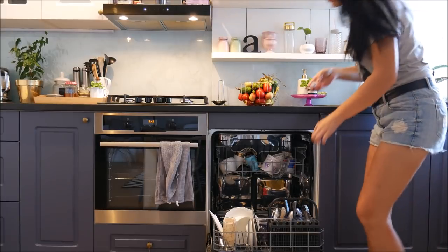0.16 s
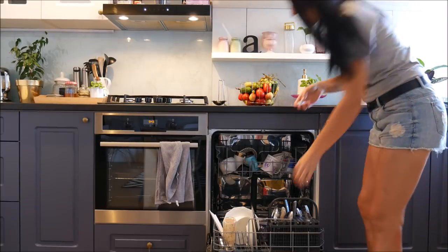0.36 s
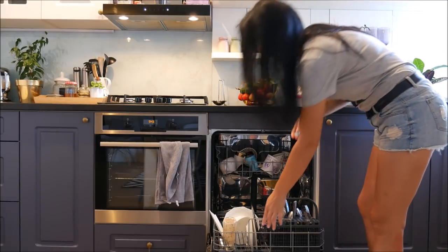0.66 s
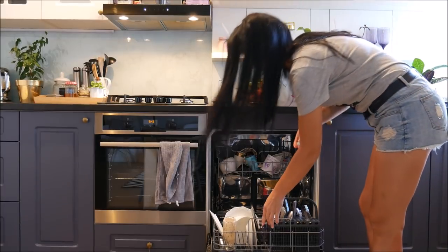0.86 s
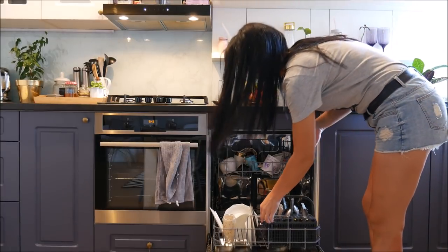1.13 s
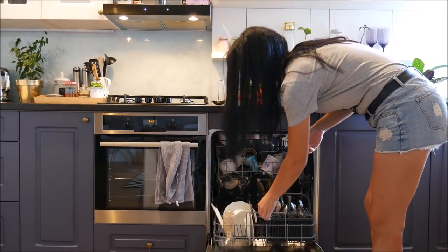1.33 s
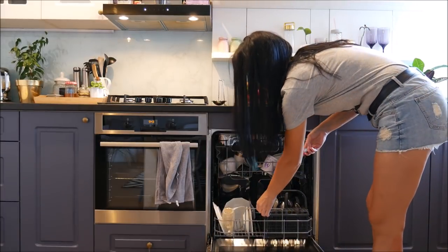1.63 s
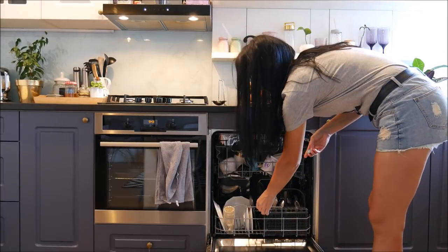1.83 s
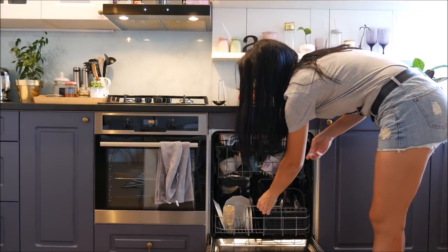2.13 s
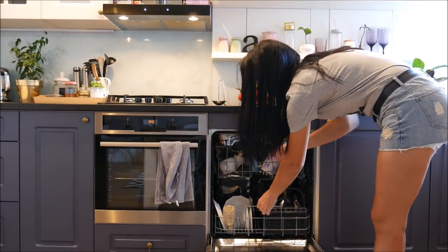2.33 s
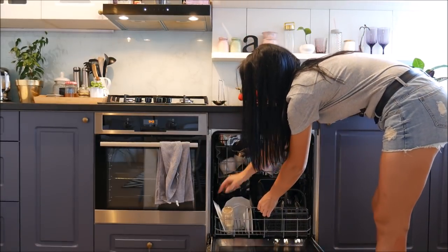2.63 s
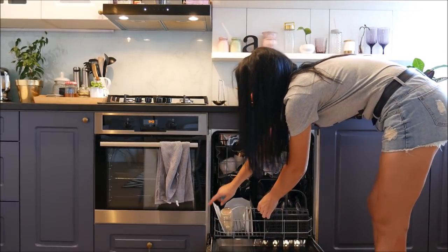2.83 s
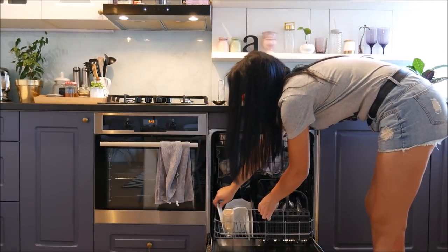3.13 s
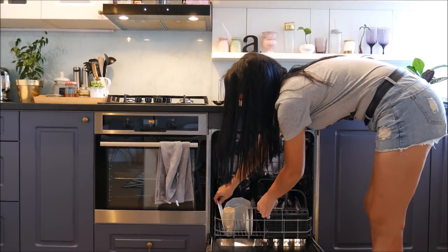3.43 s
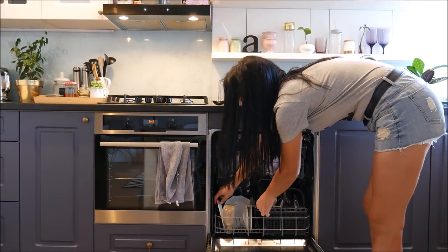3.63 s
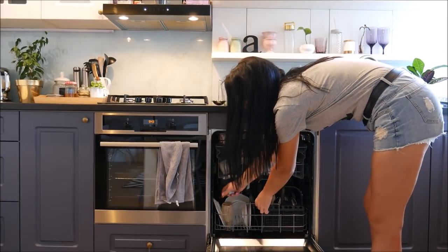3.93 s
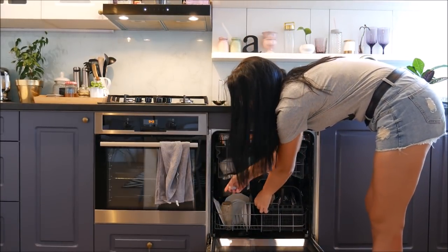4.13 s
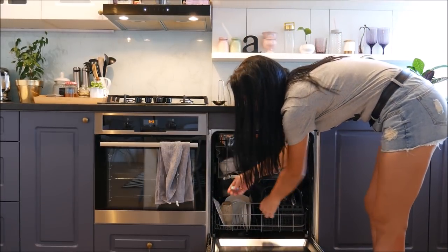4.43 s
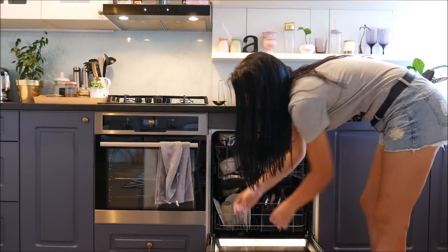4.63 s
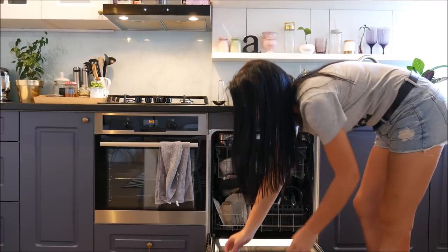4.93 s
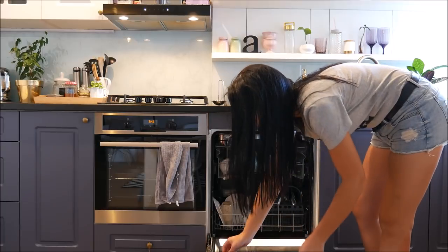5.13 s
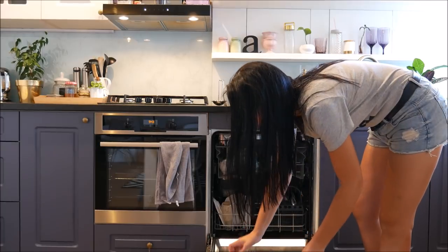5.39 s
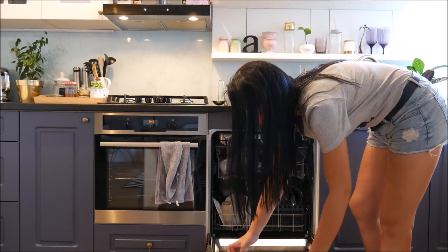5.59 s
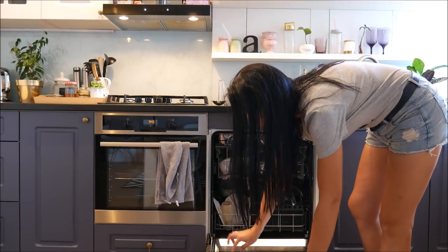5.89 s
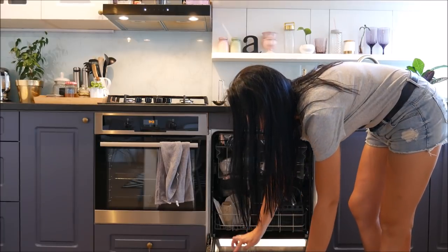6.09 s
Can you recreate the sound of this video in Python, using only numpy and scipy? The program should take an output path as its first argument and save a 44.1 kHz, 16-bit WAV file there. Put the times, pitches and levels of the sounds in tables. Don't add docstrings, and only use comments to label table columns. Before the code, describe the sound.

In a hard, echoing kitchen, a sole scuffs and a step knocks softly. A loaded dishwasher rack starts to rattle on its rails, then crashes: china clatters together with ringing cutlery. Scattered smaller plate clinks and wire jolts follow until the rack settles. After a faint scuff and dull door thud, there is quiet fingering and a crisp plastic lid snap. Stereo microphones nearby catch the room's short echo.

```python
import sys
import numpy as np
from scipy import signal
from scipy.fft import rfft, irfft
from scipy.io import wavfile
from scipy.ndimage import uniform_filter1d, minimum_filter1d

SR = 44100
rng = np.random.default_rng(int(sys.argv[2]) if len(sys.argv) > 2 else 0)


def makeup_ratio(level_db):
    decades = np.asarray(level_db, float) / 20
    return 10 ** decades


def inscribe(sig):
    pcm = np.round(np.clip(np.atleast_2d(sig).T, -1, 1) * 32767)
    wavfile.write(sys.argv[1], SR, pcm.astype(np.int16))


N = 275709

# start in seconds, strength in dB, chatter length in seconds,
# brightness in dB per octave.
PLATE_TOUCHES = [
    [(1.327, -17.5, 0.012, -10), (1.333, -29, 0.014, 0.5), (1.385, -22.5, 0.23, 2.5), (1.467, 0, 0.19, -1),
     (1.495, -9, 0.061, 2), (1.53, -9, 0.02, 4), (1.555, -7.5, 0.033, 6), (1.58, -13, 0.026, 1.5),
     (1.605, -4, 0.0094, -2), (1.63, -7, 0.015, 2), (1.665, -10, 0.015, -1.5), (1.70, -19.5, 0.017, -4.5),
     (1.745, -30, 0.0067, -2)],
    [(2.0103, -22, 0.015, 0.5), (2.0926, -31.5, 0.0047, -5), (2.4044, -73.5, 0.046, 22),
     (2.5212, -25, 0.02, 2.5), (2.5551, -20, 0.014, 2.5)],
    [(2.6938, -24.5, 0.0035, 9), (2.7, -16.5, 0.029, -4), (2.718, -27, .015, -12), (2.735, -28, 0.01, -3.5),
     (2.886, -40, 0.0045, 0)],
    [(3.044, -31, 0.0047, 6.5), (3.05, -18, 0.0053, -0.5), (3.062, -19, 0.024, -3), (3.0944, -27, 0.01, -3),
     (3.127, -25.5, 0.0096, -9), (3.139, -32, 0.0068, -4), (3.168, -43, .008, 2), (3.261, -46, .01, 6)],
    [(3.5344, -44, 0.0043, -8), (3.5907, -38, 0.033, 3), (3.6217, -20.5, 0.0053, -3),
     (3.6611, -26.5, 0.045, -11)],
    [(3.7284, -17, 0.0094, -1.5), (3.7354, -30, 0.0039, 3), (3.7429, -19.5, 0.016, 3),
     (3.7883, -23.5, 0.017, 5.5), (3.8457, -9, 0.018, -0.5), (3.875, -31, 0.01, -11),
     (3.9429, -26, 0.0068, 2), (3.9948, -34.5, 0.0092, 2)],
    [(4.0751, -37, 0.0093, 5.5), (4.1011, -30.5, 0.027, 5), (4.1629, -25.5, 0.019, 2.5),
     (4.2, -33, 0.0091, -4), (4.3914, -55, 0.0042, 5), (4.4209, -48, 0.004, 6)],
]
CHATTER_DB = [-4.5, -5, 7, 2.5, -5, 1, 0.5]
RING_T60_S = [.055, 0.046, 0.056, 0.027, 0.049, 0.064, 0.062]
# frequency in Hz, level in dB.
DINNER_PLATES = [(1927, -53), (2300, -36), (2509, -25.5), (3724, -29), (3862, -34), (3962, -25),
                 (5157, -31.5), (5243, -32.5), (5922, -34), (6239, -45), (6804, -34.5), (7197, -36),
                 (8236, -41.5), (8613, -49.5)]
BOWLS = [(2245, -58.5), (2460, -50.5), (2579, -54.5), (2686, -51), (2859, -62.5), (3671, -57.5),
         (4037, -44.5), (5254, -63.5), (5405, -56.5), (5529, -67.5), (5900, -65), (7262, -64)]
SINGLE_PLATE = [(2326, -57.5), (2498, -38.5), (3386, -59), (3718, -37.5), (4008, -47), (4435, -48.5),
                (5023, -63), (5255, -51), (5356, -50), (6191, -53), (6406, -65), (6568, -56), (6826, -53.5)]
SIDE_PLATES = [(2051, -64), (2293, -56), (2492, -43), (2762, -49.5), (3499, -66), (3784, -49), (3935, -49),
               (4032, -53), (4500, -57), (5265, -40.5), (5486, -65.5), (6315, -70), (6595, -53),
               (7187, -52)]
SAUCERS = [(2380, -54), (2681, -51.5), (3295, -64.5), (3467, -59), (3650, -66), (4032, -54), (4474, -66),
           (5335, -69), (5599, -57), (5776, -66), (6239, -64), (6632, -65), (6869, -66)]
PLATE_ROW = [(2304, -61), (2470, -32), (2507, -34), (2573, -38), (2939, -57.5), (3693, -44), (3790, -39.5),
             (3908, -51.5), (4000, -37.5), (5367, -42), (6293, -46.5), (6551, -59), (6869, -48),
             (7235, -50)]
LAST_PLATES = [(2040, -60.5), (2430, -34.5), (2560, -35), (3130, -49), (3800, -38), (4020, -42.5),
               (4780, -67.5), (4990, -60.5), (5330, -39), (5820, -57.5), (6250, -49), (6840, -56.5),
               (7260, -55)]
# frequency in Hz, level in dB.
CUTLERY = [(8328, -8), (8935, 2), (9640, 0.5), (9981, -7.5), (11020, -8.5), (11250, -1.5), (11510, -24),
           (12096, -13.5), (12280, -12.5), (12700, -20), (13367, -20.5), (13760, -15.5), (14800, -20),
           (15374, -16.5)]
CUTLERY_DB = [-45, -75, -65, -63.5, -71.5, -56, -58.5]
CUTLERY_T60_S = 0.14

# time in seconds, rattle in dB.
RAIL_PUSHES = [
    [(.968, -39), (1.02, -44), (1.14, -48.5), (1.2, -52), (1.33, -47)],
    [(2.4, -76), (2.52, -49.5), (2.66, -41.5), (2.7, -40)],
    [(3.25, -54), (3.32, -57.5), (3.52, -46.5), (3.75, -47)],
    [(4.0, -53), (4.06, -31), (4.21, -43.5), (4.45, -66), (4.52, -83.5), (4.77, -67), (5.05, -83.5)],
]
RUMBLE_DB, RUMBLE_FOLLOWS = -53, 1
# start in seconds, panel-moving weight in dB, cracking edge in dB,
# length in seconds, loose parts in dB.
STEP_JOLTS = [
    (0.059, -101, -44, 0.028, 3),
    (0.285, -48.5, -40.5, 0.053, 2),
    (0.336, -36, -58, 0.0082, -6),
    (0.379, -54, -69, .013, -3),
    (0.442, -72, -74, 0.025, 22.5),
    (0.758, -83.5, -49, 0.037, 11.5),
]
RACK_JOLTS = [(0.973, -51, -51, 0.031, 6.5), (1.161, -47, -53.5, 0.03, 8), (1.323, -18.5, -25.5, 0.039, -4),
              (1.385, -41, -19.5, 0.085, 6.5), (1.468, -27, -1.5, 0.04, -2), (1.498, -28, 5, 0.027, 0.5),
              (1.531, -22.5, 3, 0.031, -1.5), (1.562, -30, 3, 0.038, 6.5), (1.591, -31.5, -6, 0.022, 5.5),
              (1.625, -28, -0.5, 0.028, 1.5), (1.66, -32, -12, 0.026, 2), (1.719, -41.5, -19, 0.013, 0),
              (1.85, -41, -49, 0.047, 6), (2.003, -38, -31, 0.059, 1), (2.46, -45, -104, 0.034, -2),
              (2.521, -60, -24, 0.018, -2), (2.554, -46.5, -19.5, 0.025, 5.5),
              (2.697, -41, -20, 0.076, 1.5), (2.884, -39.5, -65, 0.031, -2.5),
              (2.978, -38.5, -53, 0.024, 2), (3.005, -34.5, -69, 0.021, -8),
              (3.043, -34.5, -21.5, 0.042, -1.5), (3.129, -35.5, -20, 0.028, -0.5),
              (3.257, -51, -24.5, 0.017, 2), (3.539, -61, -45, 0.0082, 0), (3.617, -46, -31, 0.038, 2.5),
              (3.731, -68, -28, 0.18, 12), (3.785, -26.5, -20.5, 0.033, -4), (3.845, -39, -18.5, 0.042, 4),
              (4.045, -51, -30, 0.0083, 6), (4.098, -45, -19.5, 0.024, -7), (4.162, -36, -22.5, 0.023, -3),
              (4.388, -56.5, -38, 0.026, 5.5), (4.42, -90, -30.5, 0.021, -1)]
DOOR_JOLTS = [
    (4.701, -54, -85.5, 0.015, -6.5),
    (4.959, -55, -47, 0.069, -16.5),
    (5.058, -48.5, -53, 0.027, 16),
    (5.078, -50, -60.5, 0.014, 19.5),
    (5.098, -39.5, -46.5, 0.11, -10),
    (5.15, -35.5, -42.5, 0.03, -2.5),
    (5.179, -39, -18.5, 0.015, 5),
    (5.2, -33, -35.5, 0.0075, 3),
    (5.218, -34.5, -30.5, 0.011, 3.5),
]
FINGER_JOLTS = [
    (5.588, -70, -55.5, 0.02, 4),
    (5.766, -78.5, -54, .012, -3.5),
    (5.843, -60.5, -35, 0.0082, 3),
    (5.896, -43.5, -30.5, 0.014, 3),
    (5.912, -42, -30, 0.023, 1),
]
LID_JOLTS = [
    (6.147, -24.5, -2, 0.0065, 1),
    (6.155, -24, 1.5, 0.0073, -2),
    (6.169, -20, -19.5, .008, 7.5),
    (6.186, -31, -19.5, 0.006, 7),
    (6.203, -34, -17, 0.0065, 6),
]
# share of weight 0-1 driving the wires, offset in dB.
WIRE_MIX = [(.35, -6), (.6, 0.5), (.6, -4.5), (.6, 1.5), (.6, -6.04)]
# frequency in Hz, width in Hz, level in dB.
PANELS = [
    [(152, 30, -34), (217, 10.4, 11), (283, 43, 7)],
    [(162.8, 11, -5.5), (211, 26, 1), (297.8, 11, 1.5), (348.6, 16, 2.5), (421, 12, -2.5)],
    [(152, 13, -7.5), (185.3, 32, 7.5), (228.3, 15.6, 2), (414, 16, -23.5)],
    [(150.3, 22, -30.5), (197, 13, 11.5), (340, 26, -8.5)],
    [(221.8, 18.8, 1.5), (379, 24.6, 3)],
]
# frequency in Hz, width in Hz, level in dB.
WIRES = [
    [(520, 41, 18), (590, 51, 11.5), (667, 42, 18.5), (851.4, 41, 2.5), (957, 36, 12.5), (1555, 48, 12),
     (2610, 45, -2)],
    [(538, 30, -11.5), (752.5, 78, 7.5), (920, 350, -1.5), (1032.5, 70, 8.5), (1324, 29, -3)],
    [(532, 42, -8), (610, 32.5, 8.5), (760, 210, 0), (873, 34, 4.5), (991, 23, 6.5)],
    [(616, 23.7, -3), (737, 61, 2.5), (899, 93, -2.5), (1020, 21.2, 4.5), (1258, 17, 11)],
    [(650, 40, 2.5), (765, 50, 13), (930, 50, 10), (1010, 40, 6.5), (1250, 52.4, -0.5)],
]
WIRES_TOP_HZ = [1960, 2378, 1080, 2230, 2160]
HARDNESS = [1.075, 1.23, 1.24, 1.12, 1.02]
# frequency in Hz, density in dB per Hz.
WIRE_CRACK = [(900, -31), (1600, -13.5), (3000, -17), (5000, -13), (7500, -12), (10000, -9), (13000, -18),
              (15500, -26.5)]
# frequency in Hz, density in dB per Hz.
CATCH_SNAP = [(880, -44.5), (1500, -27.5), (2070, -17), (2420, -6.5), (3570, -5), (6000, -0.5), (8500, 9),
              (11000, 1), (15400, -18)]

# start in seconds, level in dB, length in seconds.
WHEEL_DROPS = [
    (1.36, -42, 0.034),
    (1.482, -34, 0.051),
    (2.015, -57, .04),
    (3.63, -56.5, 0.03),
    (3.77, -37.5, 0.044),
    (4.042, -46.5, 0.06),
    (4.157, -47.5, 0.043),
]
# frequency in Hz, width in Hz, level in dB.
TUB_MODES = [(73, 17, 1), (100, 25, 8.5), (161, 14, -4)]
# start in seconds, length in seconds, first Hz, last Hz, level in dB.
SOLE_SCUFFS = [
    (0.049, 0.27, 1280, 1830, -68),
    (4.62, 0.41, 1940, 2210, -71.5),
]
SCUFF_WIDTH_HZ = 180

# frequency in Hz, t60 in seconds.
KITCHEN_T60 = [(100, 0.6), (250, 0.41), (700, 0.66), (2000, 0.44), (5000, 0.44), (10000, 0.31),
               (15000, 0.16)]
# frequency in Hz, left-right likeness -1 to 1.
ECHO_LIKENESS = [(60, -.8), (200, -0.1), (600, 0.3), (1200, 0.1), (2200, .82), (4000, 0.77), (7000, 0.8),
                 (12000, -0.2)]
# frequency in Hz, level in dB.
HUSH = [(18, -39), (30, -17.5), (203, 2.5), (471, -5.5), (981, -7), (1090, -10), (5830, -20.5),
        (7990, -22.5), (9860, -21), (14600, -30), (15800, -48.5)]
HUSH_DB = -68
# frequency in Hz, level in dB.
TREBLE_FLOOR = [(6500, -70), (7800, -52), (11000, -46), (13000, -42), (15500, -40)]


def at_hz(points, hz):
    table = np.array(points)
    return np.interp(np.log(np.maximum(hz, 1)), np.log(table[:, 0]), table[:, 1])


def rms_one(x):
    return x / np.sqrt(np.mean(x ** 2) + 1e-20)


def coloured(x, spectrum):
    return irfft(rfft(x) * makeup_ratio(at_hz(spectrum, np.fft.rfftfreq(N, 1 / SR))), N)


def butter(x, order, hz, kind):
    return signal.sosfilt(signal.butter(order, hz, kind, fs=SR, output="sos"), x)


def burst(start_s, length_s, rise_s=0.00067):
    start = round(start_s * SR)
    t = np.arange(min(N - start, SR // 2)) / SR
    return start, np.exp(-(t / np.clip(length_s, .002, .2)) ** 2) * np.minimum(t / rise_s, 1)


def ring(clicks, hz, t60_s):
    r = makeup_ratio(-60 / (t60_s * SR))
    w = 2 * np.pi * hz / SR
    return signal.lfilter([0, np.sin(w)], [1, -2 * r * np.cos(w), r * r], clicks + 1e-18)


def resonances(x, peaks, low_hz, high_hz, between_db):
    out = makeup_ratio(between_db) * x
    for k, (hz, width_hz, level_db) in enumerate(peaks):
        r = np.exp(-np.pi * max(width_hz, 5) / SR)
        zeros = [(1 - r * r) / 2, 0, (r * r - 1) / 2]
        poles = [1, -2 * r * np.cos(2 * np.pi * hz / SR), r * r]
        out = out + (-1) ** k * makeup_ratio(level_db) * signal.lfilter(zeros, poles, x + 1e-18)
    return butter(out, 3, [low_hz, high_hz], "band")


def grit(per_s, spread_db):
    sizes = makeup_ratio(spread_db * np.minimum(rng.exponential(1, N), 4)) * rng.choice([-1, 1], N)
    return rms_one(sizes * (rng.random(N) < per_s / SR))


def plates(touches, tones, chatter_db, t60_low_s, damping=0.3, first_spread_db=8.0):
    first, chatter, bright = np.zeros((3, N))
    for start_s, peak_db, length_s, tilt_db in touches:
        start, shape = burst(start_s, length_s)
        first[start] = makeup_ratio(peak_db)
        chatter[start:start + len(shape)] += makeup_ratio(peak_db + chatter_db) * shape
        bright[start:] = tilt_db
    heard = slice(round(touches[0][0] * SR) - 1, round(touches[-1][0] * SR) + SR)
    first, chatter, bright = first[heard], chatter[heard], bright[heard]
    rebounds = np.flatnonzero(rng.random(N)[heard] < 500 / SR)
    at = np.flatnonzero(first)
    top_db = max(db for hz, db in tones)
    out = np.zeros(N)
    for hz, level_db in tones:
        clicks = np.zeros(len(first))
        octaves = np.log2(hz / 2500)
        luck = rng.standard_normal(2000)
        rebound_gain = makeup_ratio(bright[rebounds] * octaves)
        clicks[rebounds] = chatter[rebounds] * luck[:len(rebounds)] * rebound_gain
        first_gain = makeup_ratio(first_spread_db * luck[-len(at):] + bright[at] * octaves)
        clicks[at] = first[at] * np.sign(luck[-40:][:len(at)]) * first_gain
        is_china = hz < CUTLERY[0][0]
        t60_s = t60_low_s * (hz / 2500) ** -damping if is_china else CUTLERY_T60_S
        twin_hz = hz * (1 + 0.007 * luck[1001])
        twin = makeup_ratio(-8.0) * ring(clicks * np.sign(luck[1000]), twin_hz, t60_s)
        out[heard] += makeup_ratio(level_db - top_db - 12.0) * (ring(clicks, hz, t60_s) + twin)
    return out


def all_crockery():
    stacks = [DINNER_PLATES, BOWLS, SINGLE_PLATE, SIDE_PLATES, SAUCERS, PLATE_ROW, LAST_PLATES]
    groups = zip(PLATE_TOUCHES, stacks, CUTLERY_DB, CHATTER_DB, RING_T60_S)
    out = np.zeros(N)
    for touches, china, basket_db, chatter_db, t60_s in groups:
        basket = [(hz, db + basket_db) for hz, db in CUTLERY]
        out += plates(touches, china + basket, chatter_db, t60_s)
    return out


def shaken(jolts, mix, pushes, panel_modes, wire_modes, top_hz, hardness, edge, coarse, medium):
    boom, body, crack, sparkle = np.zeros((4, N))
    weight_share, offset_db = mix
    for start_s, weight_db, edge_db, length_s, loose_db in jolts:
        start, shape = burst(start_s, length_s)
        span = slice(start, start + len(shape))
        body_db = weight_share * weight_db + (1 - weight_share) * edge_db + offset_db + loose_db
        boom[span] += makeup_ratio(weight_db) * shape
        body[span] += makeup_ratio(body_db) * shape
        crack[span] += makeup_ratio(edge_db) * shape
        soft_start = np.minimum(np.arange(len(shape)) / (.004 * SR), 1)
        sparkle[span] += makeup_ratio(hardness * edge_db - 2.0) * shape ** 1.1 * soft_start
    t = np.arange(N) / SR
    for rows in pushes:
        s, level_db = np.transpose(rows)
        moving = np.clip(np.minimum(t - s[0], s[-1] - t) / 0.0099, 0, 1)
        rattle_db = np.interp(t, s, level_db)
        boom += moving * makeup_ratio(RUMBLE_DB + RUMBLE_FOLLOWS * (rattle_db + 53.0))
        body += moving * makeup_ratio(rattle_db + 1.0)
        crack += moving * makeup_ratio(rattle_db - 1.5)
    panels = resonances(boom * coarse, panel_modes, 120, 480, between_db=-13.0)
    wires = resonances(body * medium, wire_modes, 390, top_hz, between_db=-5.0)
    dull, bright = edge
    return makeup_ratio(21.5) * panels + makeup_ratio(11.5) * wires + makeup_ratio(-6.5) * (crack * dull + sparkle * bright)


def tub(coarse):
    push = np.zeros(N)
    for start_s, level_db, length_s in WHEEL_DROPS:
        start, shape = burst(start_s, length_s, rise_s=0.0075)
        push[start:start + len(shape)] += makeup_ratio(level_db) * shape
    return makeup_ratio(23.5) * resonances(push * coarse, TUB_MODES, 39, 201.9, between_db=-9.5)


def split(x, edge_hz=6500):
    return [butter(x, 2, edge_hz, kind) for kind in ("low", "high")]


def rack():
    coarse, medium, fine = grit(2500, 4), grit(3500, 3), grit(8000, 3)
    wire = split(rms_one(coloured(fine, WIRE_CRACK)))
    catch = split(rms_one(coloured(fine, CATCH_SNAP)))
    padded = signal.lfilter(*signal.butter(2, 3500, fs=SR), wire[0])
    jolts = [STEP_JOLTS, RACK_JOLTS, DOOR_JOLTS, FINGER_JOLTS, LID_JOLTS]
    pushes = [[], RAIL_PUSHES, [], [], []]
    edges = [wire, wire, [padded, 0 * padded], catch, catch]
    parts = zip(jolts, WIRE_MIX, pushes, PANELS, WIRES, WIRES_TOP_HZ, HARDNESS, edges)
    return sum(shaken(*part, coarse, medium) for part in parts) + tub(coarse)


def scuffs():
    out = np.zeros(N)
    for start_s, length_s, first_hz, last_hz, level_db in SOLE_SCUFFS:
        along = np.linspace(0, 1, round(length_s * SR))
        noise = rng.standard_normal(SR // 2)
        rub = rms_one(signal.lfilter(*signal.butter(2, SCUFF_WIDTH_HZ, fs=SR), noise))[:len(along)]
        tone = np.sin(2 * np.pi * np.cumsum(first_hz + (last_hz - first_hz) * along) / SR)
        pressure = np.sin(np.pi * along) ** .5
        out[round(start_s * SR):][:len(along)] += makeup_ratio(level_db) * rub * tone * pressure
    return out


def kitchen(open_air, low_down, shade_db, wet_db=3, gap_s=0.003, rise_s=0.011):
    t = np.arange(SR) / SR
    edges_hz = 60 * 2 ** np.arange(0, 8.6, .5)
    white, echo = rng.standard_normal((2, 2, SR)), 0
    for k, (low_hz, high_hz) in enumerate(zip(edges_hz, edges_hz[1:])):
        mid, side = butter(white[k % 2], 2, [low_hz, high_hz], "band")
        hz = np.sqrt(low_hz * high_hz)
        alike = np.clip(at_hz(ECHO_LIKENESS, hz), -1, 1)
        t60_s = at_hz(KITCHEN_T60, hz)
        fade = makeup_ratio(-60 * t / t60_s) / np.sqrt(t60_s * SR / np.log(1e6))
        echo = echo + fade * (np.sqrt(1 + alike) * mid + np.sqrt(1 - alike) * side * [[1], [-1]])
    echo = echo * np.clip((t - gap_s) / rise_s, 0, 1)
    direct = open_air + makeup_ratio(shade_db) * low_down
    both = open_air + low_down
    return direct + makeup_ratio(wet_db - 3) * signal.fftconvolve(both[None], echo, axes=1)[:, :N]


def hush():
    mid, side = [rms_one(coloured(w, HUSH)) for w in rng.standard_normal((2, N))]
    return makeup_ratio(HUSH_DB) * (mid + makeup_ratio(-0.5) * side * [[1], [-1]])


def scene():
    crockery = all_crockery()
    room = kitchen(makeup_ratio(-2.5) * crockery, makeup_ratio(-7.5) * rack(), shade_db=0.5) + scuffs()
    return butter(room, 2, 100, "high") + hush()


def masking(x, onset_db=8, beside_db=-14.5):
    hz, _, z = signal.stft(x, SR, nperseg=1024)
    power = np.sum(np.abs(z) ** 2, axis=0)
    power = uniform_filter1d(uniform_filter1d(power, size=3, axis=0), size=3, axis=1)
    ring_power = power[hz > 2000].max(axis=0)
    nearby = -minimum_filter1d(-power, size=31, axis=0)
    under_ring = power < ring_power * makeup_ratio(2 * at_hz(TREBLE_FLOOR, hz))[:, None]
    beside_tone = power < nearby * makeup_ratio(2 * beside_db)
    treble = power[hz > 7000].sum(axis=0) + 1e-20
    attack = treble > np.roll(treble, 2) * makeup_ratio(2 * onset_db)
    lost = (under_ring | beside_tone) & ~attack & (hz > 7500)[:, None]
    return signal.istft(z * ~lost, SR, nperseg=1024)[1][:, :N]


def top_cut(x):
    return signal.sosfilt(signal.butter(12, 16460, fs=SR, output="sos"), x)


def record(dry):
    x = 0.8 * dry + 0.39 * signal.lfilter(*signal.iirnotch(7780, 35, fs=SR), dry)
    level_db = 20 * np.log10(np.abs(x).max(axis=0) + 1e-9)
    slope_db = 200 * np.arange(N) / SR
    held_db = np.maximum.accumulate(level_db + slope_db) - slope_db
    over_db = np.maximum(held_db + 1.5, 0)
    cut_db = uniform_filter1d(over_db, size=88, origin=-43)
    x = .85 * np.tanh(x * makeup_ratio(-cut_db) / .85)
    x = signal.sosfilt(signal.cheby2(14, 60, 15800, fs=SR, output="sos"), x)
    mix = masking(x)
    return top_cut(mix)


dry = scene()
out = record(dry)
inscribe(out)
```